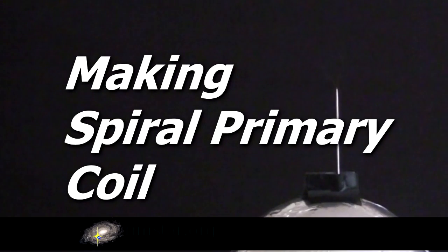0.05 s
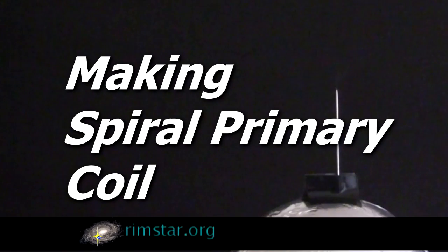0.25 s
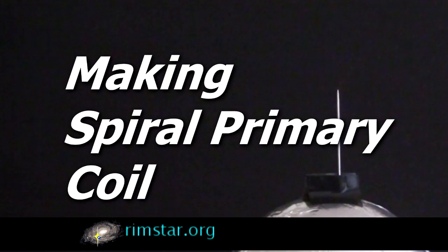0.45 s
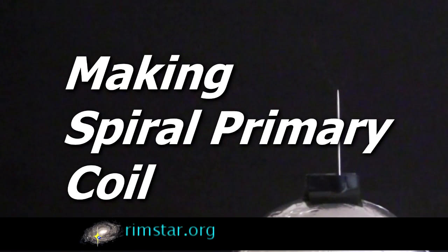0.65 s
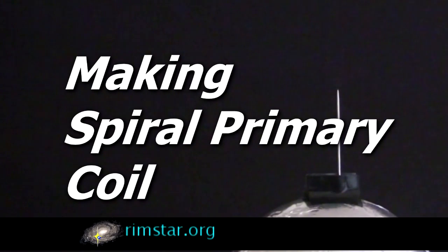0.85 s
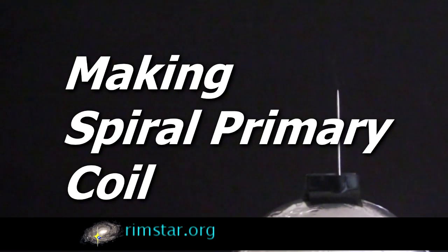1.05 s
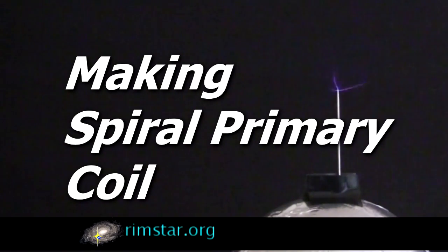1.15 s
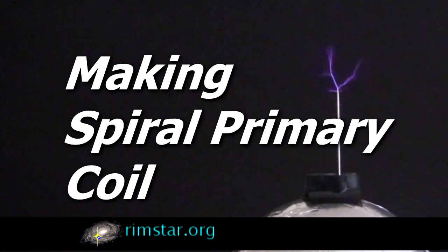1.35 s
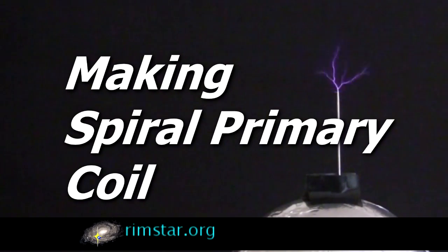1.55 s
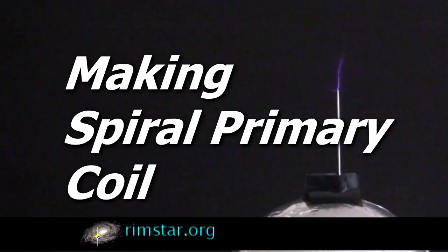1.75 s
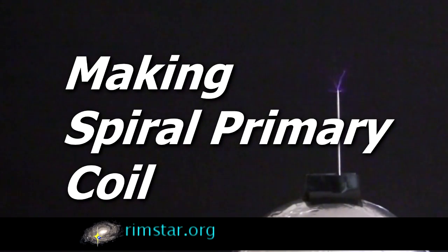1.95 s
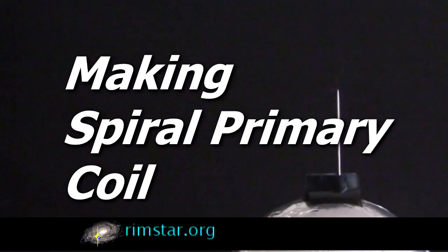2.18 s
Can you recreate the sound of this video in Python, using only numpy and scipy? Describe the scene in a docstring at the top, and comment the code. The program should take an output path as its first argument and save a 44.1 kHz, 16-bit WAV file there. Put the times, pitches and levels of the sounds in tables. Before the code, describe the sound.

Small spark-gap high-voltage coil crackling in a fast, even buzz of sharp snaps over steady sizzle

```python
"""Harsh electric snaps about fifteen times a second over a steady sizzle: a small spark-gap coil close to a microphone.
Each discharge is a thin leading crack, a bright snap and a dull pop, made as fixed pulses with per-spark levels.
Short decaying sines ring after each snap; pulses and noise bursts echo and scatter it off nearby surfaces.
A long ring of shaped noise outlasts the gaps between sparks and makes the sizzle.
Filtered noise adds a slow drift below 10 Hz with a faint low rumble above it."""
import sys
import numpy as np
from scipy import signal
from scipy.fft import rfft, irfft, next_fast_len
from scipy.io import wavfile
from scipy.ndimage import uniform_filter1d

SR = 44100
rng = np.random.default_rng(int(sys.argv[2]) if len(sys.argv) > 2 else 0)


def generate_wav(sig):
    """Save sig (samples, or channels by samples) to the path in sys.argv[1] as 16-bit PCM at SR."""
    pcm = np.round(np.clip(np.atleast_2d(sig).T, -1, 1) * 32767).astype(np.int16)
    wavfile.write(sys.argv[1], SR, pcm)


N = 97857
LEAD = 2 * SR  # samples of running before the start
TAIL = SR  # samples in a response
HZ = np.fft.rfftfreq(TAIL, 1 / SR)
AGE_S = np.arange(TAIL) / SR
# table levels are relative; the *_GAIN_DB settings add to them


def amp(db):
    """Decibels to amplitude gain."""
    return 10 ** (np.asarray(db) / 20)


def along(points, hz):
    """Interpolate (frequency [Hz], value) points on a log-frequency axis."""
    point_hz, values = np.transpose(points)
    return np.interp(np.log(hz + 1), np.log(point_hz + 1), values)


def pulse(spectrum, delay_s=0):
    """Response of a delayed minimum-phase pulse: folding the cepstrum makes it causal and shortest."""
    cepstrum = irfft(np.log(amp(along(spectrum, HZ))), TAIL)
    cepstrum[1:TAIL // 2] *= 2
    cepstrum[TAIL // 2 + 1:] = 0
    delay = -2j * np.pi * HZ * delay_s
    return np.exp(rfft(cepstrum) + delay)


def even_colour(response, width_bins):
    """Divide out the smoothed magnitude, so a response has no broad colour of its own."""
    power = uniform_filter1d(np.abs(response) ** 2, size=width_bins)
    return response / np.sqrt(np.abs(power))


def burst(t60_s):
    """Response of a brief cluster of reflections: noise with one exponential decay."""
    noise = rng.standard_normal(TAIL)
    return even_colour(rfft(noise * amp(-60 * AGE_S / t60_s)), 1200)


def diffuse(t60_points):
    """Response of dense reflections: noise whose decay time depends on frequency."""
    hz, time_s, bands = signal.stft(rng.standard_normal(TAIL), SR, nperseg=128)
    decay = amp(-60 * time_s / along(t60_points, hz)[:, None])
    tail = signal.istft(bands * decay, SR)[1][:TAIL]
    return even_colour(rfft(tail), 500)


def fire(times_s, gains, response):
    """Convolve a train of weighted impulses, one per spark, with one response."""
    samples = np.round(times_s * SR).astype(int) + LEAD
    train = np.bincount(samples, gains, N + LEAD)
    return signal.fftconvolve(train, irfft(response, TAIL))[LEAD:LEAD + N]


# discharges: (time [s], snap level [dB], pop level [dB], extra pop bass [dB])
DISCHARGES = [(0.026, -1.4, -1.2, 2.5), (0.0943, -0.2, 0, 0.9), (0.1623, -0.8, -0.2, -2),
              (0.2297, -0.5, -0.1, -2), (0.2988, -0.8, -0.7, 3), (0.3655, -1.5, -2, 3.5),
              (0.4332, -1.5, 0, -3), (0.4998, -1.5, -1, -2), (0.567, -1.5, -0.5, 1.5),
              (0.6342, -1.1, -1, -2), (0.702, -1.3, -0.5, 0.1), (0.7692, -0.5, -0.1, -0.5),
              (0.8368, -0.2, -1.4, 3.8), (0.9046, -0.5, -0.2, 1), (0.9719, -1, -0.2, 2),
              (1.0394, -0.5, -1.5, 1.5), (1.107, -0.9, 0.1, 1.5), (1.1746, -0.1, 0.6, -0.9),
              (1.2426, -0.8, 0.4, 2), (1.31, -0.3, 0.5, -2), (1.3767, -0.5, 0.5, 1.5),
              (1.444, -0.5, 0.2, 1.0), (1.5103, -1.4, -0.5, -0.5), (1.5774, -1.1, -1, 2),
              (1.6447, -1, -2.2, 2), (1.712, -1, -0.3, 1.2), (1.7786, -0.6, -1.9, 3), (1.846, -1, 0, -4),
              (1.9131, -0.6, -0.7, -5), (1.9801, -0.1, 0.5, -0.1), (2.0469, -0.5, 0.5, 0),
              (2.1141, -1, -0.3, -1), (2.182, -0.5, 0.1, 2)]
RUN_IN_COUNT, RUN_IN_RATE_HZ = 16, 17  # earlier sparks still ring in the room


def discharges():
    """Columns of the discharge table, led by the evenly spaced sparks of a coil already running."""
    earlier = np.zeros((RUN_IN_COUNT, 4))
    earlier[:, 0] = DISCHARGES[0][0] - np.arange(RUN_IN_COUNT, 0, -1) / RUN_IN_RATE_HZ
    return np.vstack([earlier, DISCHARGES]).T


# spectra of the leading crack, snap and pop: (frequency [Hz], level [dB])
CRACK_SPECTRUM = [(1000, -32), (3200, -22), (5300, -16), (6400, -23), (8000, -9), (11800, -6), (14500, -18),
                  (15600, -15), (17000, -30)]
SNAP_SPECTRUM = [(2000, -25), (5500, -29.5), (7000, -17.5), (7800, -2), (8900, -4.5), (9550, -5.5),
                 (10050, -2.5), (10700, -13.5), (11400, 4), (12600, -15), (13400, -8), (14600, -27),
                 (15600, -8.5), (17000, -47)]
POP_SPECTRUM = [(30, -8.5), (100, -8), (200, -6.5), (400, -2), (780, -3), (1100, -4.5), (2000, -7.5),
                (2800, -8.5), (3500, -0.5), (4200, -10.5), (4900, -18.5), (8000, -28), (16000, -46.5)]
CRACK_GAIN_DB, CRACK_SPREAD_DB = 1, 1.5
SNAP_GAIN_DB, SNAP_DELAY_S = 2.5, 0.000781
POP_GAIN_DB, POP_DELAY_S = 0, 0.001024
BASS_CUTOFF_HZ = 300  # one-pole low-pass on the varying bass


def spark(times_s, snap_db, pop_db, bass_db):
    """Direct pressure pulse: crack, snap, and a pop whose bass swells or thins from spark to spark."""
    crack_db = CRACK_GAIN_DB + CRACK_SPREAD_DB * rng.standard_normal(len(times_s))
    crack = fire(times_s, amp(crack_db), pulse(CRACK_SPECTRUM))
    snap = fire(times_s, amp(SNAP_GAIN_DB + snap_db), pulse(SNAP_SPECTRUM, SNAP_DELAY_S))

    pop_gains = amp(POP_GAIN_DB + pop_db)
    pop_pulse = pulse(POP_SPECTRUM, POP_DELAY_S)
    pop = fire(times_s, pop_gains, pop_pulse)
    bass_pulse = pop_pulse / (1 + 1j * HZ / BASS_CUTOFF_HZ)
    bass_change = fire(times_s, pop_gains * (amp(bass_db) - 1), bass_pulse)
    return -(crack + snap + pop + bass_change)


# short ringing tones after each snap; the highest stands for a thin treble line from closely spaced echoes:
# (frequency [Hz], level [dB], t60 [s])
RINGING_TONES = [(3480, -44, 0.027), (5170, -46.5, 0.024), (5740, -47, 0.019), (6110, -60.5, 0.0082),
                 (8340, -38.5, 0.0041), (11360, -30, 0.012)]


def ringing_tones(times_s, snap_db):
    """Short ringing tones after each snap: sines that decay exponentially from the pop's onset."""
    ring = sum(amp(level_db - 60 * AGE_S / t60_s) * np.sin(2 * np.pi * hz * AGE_S)
               for hz, level_db, t60_s in RINGING_TONES)
    delay = np.exp(-2j * np.pi * HZ * POP_DELAY_S)
    return fire(times_s, amp(snap_db), rfft(ring) * delay)


# echoes off flat surfaces: (delay [s], level [dB])
ECHO_ARRIVALS = [(.00795, -12), (.01062, -12)]
# echo colour: (frequency [Hz], level [dB])
ECHO_SPECTRUM = [(1000, -22), (3500, -13), (5500, -18), (6800, -7), (9000, -4.5), (12500, -3.5),
                 (14000, -9), (17000, -20)]
# scatter bursts off coil and bench: (delay [s], level [dB], t60 [s])
SCATTER_BURSTS = [(.0014, -2, .014), (.0049, -2, .007)]
# scatter colour: (frequency [Hz], level [dB])
SCATTER_SPECTRUM = [(150, -33), (500, -26), (1500, -32), (2400, -22), (3300, -16.5), (4500, -17.5),
                    (6500, -19.5), (9000, -11), (12000, -12.5), (13500, -16), (16000, -53)]


def near_surfaces(times_s, snap_db):
    """Flat surfaces return crisp pulses; the coil and bench return short bursts of dense scatter."""
    echoes = sum(amp(level_db) * pulse(ECHO_SPECTRUM, delay_s)
                 for delay_s, level_db in ECHO_ARRIVALS)
    scatter = sum(amp(level_db) * pulse(SCATTER_SPECTRUM, delay_s) * burst(t60_s)
                  for delay_s, level_db, t60_s in SCATTER_BURSTS)
    return fire(times_s, amp(snap_db), scatter - echoes)  # echoes share the direct pulse's sign


# colour of the long ring as the microphone hears it, peaking near 4 kHz: (frequency [Hz], level [dB])
RING_SPECTRUM = [(120, -46), (300, -44), (500, -28.5), (900, -22), (1300, -18.5), (1600, -14.5),
                 (1950, -14.5), (2500, -12.5), (3400, -10), (3850, -7), (4150, -7.5), (4400, -9),
                 (5200, -13), (6300, -18.5), (7700, -13.5), (9000, -9.5), (11600, -7), (13000, -13),
                 (14500, -23), (15700, -21), (16300, -51)]
# decay of the long ring: (frequency [Hz], t60 [s])
RING_DECAY = [(300, .8), (4000, 1.04), (10000, 1.13), (15000, 0.27)]
RING_GAIN_DB, RING_DELAY_S = 1, 0.006
WANDER_SHARE = 0.092  # share of ring power that changes as the spark takes a new path


def room(times_s, snap_db):
    """A fixed long ring after every spark, plus two rings randomly weighted per spark as its path changes."""
    gains = amp(RING_GAIN_DB + snap_db)
    colour = pulse(RING_SPECTRUM, RING_DELAY_S)
    same = fire(times_s, gains, colour * diffuse(RING_DECAY))
    changing = np.zeros(N)
    for _ in range(2):
        path_gains = gains * rng.standard_normal(len(times_s))
        changing += fire(times_s, path_gains, colour * diffuse(RING_DECAY))
    return np.sqrt(1 - WANDER_SHARE) * same + np.sqrt(WANDER_SHARE / 2) * changing


# slow drift below 10 Hz with a faint low rumble above it: (frequency [Hz], level [dB])
DRIFT_RUMBLE_SPECTRUM = [(3, 0), (10, -10), (20, -21), (32, -20), (60, -26), (120, -35), (400, -37),
                         (2000, -44), (16000, -55)]
DRIFT_RUMBLE_RMS_DB = -76  # re full scale


def drift_and_rumble():
    """Slow drift below 10 Hz with a faint low rumble above it: white noise filtered to one spectrum."""
    colour = amp(along(DRIFT_RUMBLE_SPECTRUM, np.fft.rfftfreq(N, 1 / SR)))
    noise = irfft(rfft(rng.standard_normal(N)) * colour, N)
    return amp(DRIFT_RUMBLE_RMS_DB) * noise / noise.std()


def scene():
    """Coil and surroundings at one microphone, the same in both channels."""
    times_s, snap_db, pop_db, bass_db = discharges()
    coil = spark(times_s, snap_db, pop_db, bass_db) + ringing_tones(times_s, snap_db)
    reflections = near_surfaces(times_s, snap_db) + room(times_s, snap_db)
    mono = coil + reflections + drift_and_rumble()
    return np.array([mono, mono])


BAND_LIMIT_HZ = 16700


def record(dry):
    """The recorder keeps nothing above its band limit."""
    size = next_fast_len(N + TAIL)
    passband = np.fft.rfftfreq(size, 1 / SR) < BAND_LIMIT_HZ
    return irfft(rfft(dry, size) * passband, size)[:, :N]


dry = scene()
out = record(dry)
generate_wav(out)
```